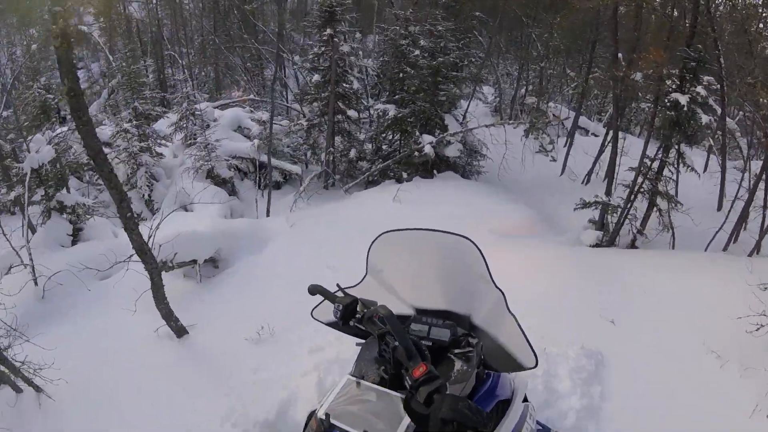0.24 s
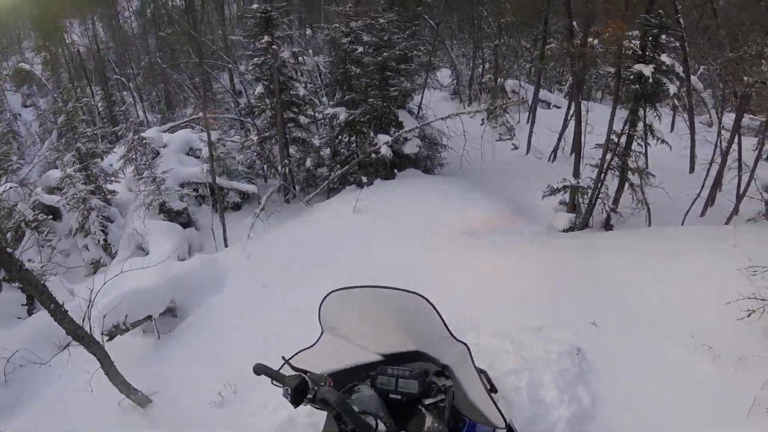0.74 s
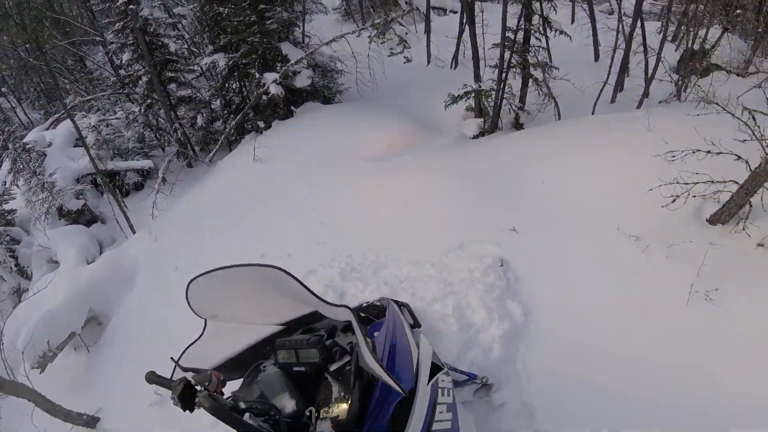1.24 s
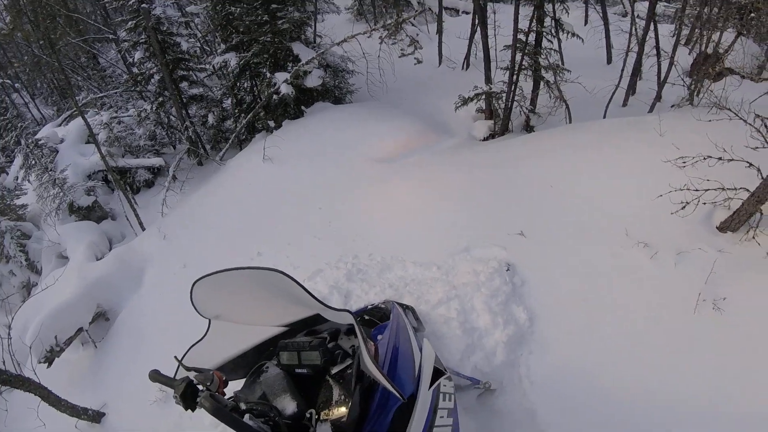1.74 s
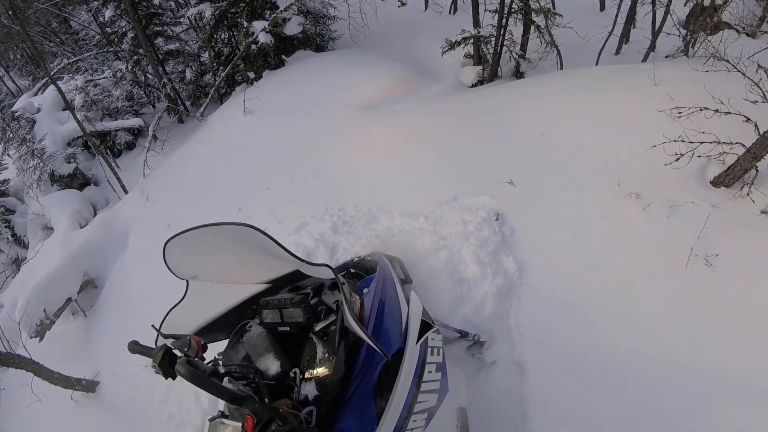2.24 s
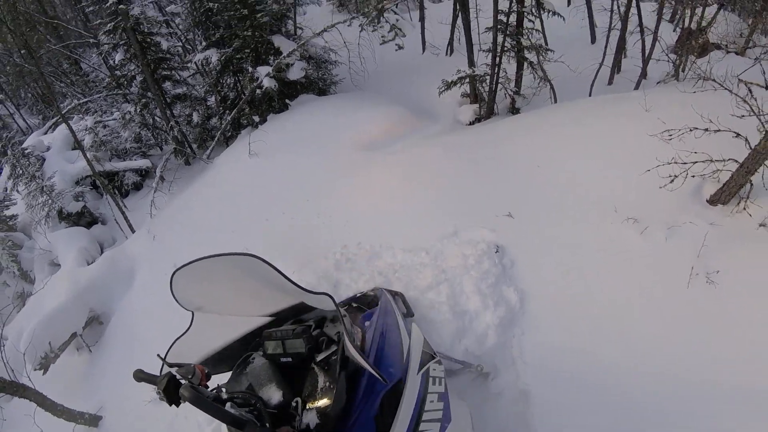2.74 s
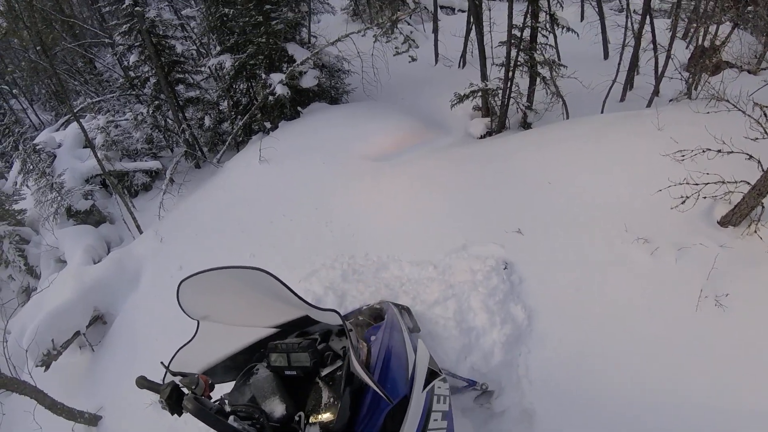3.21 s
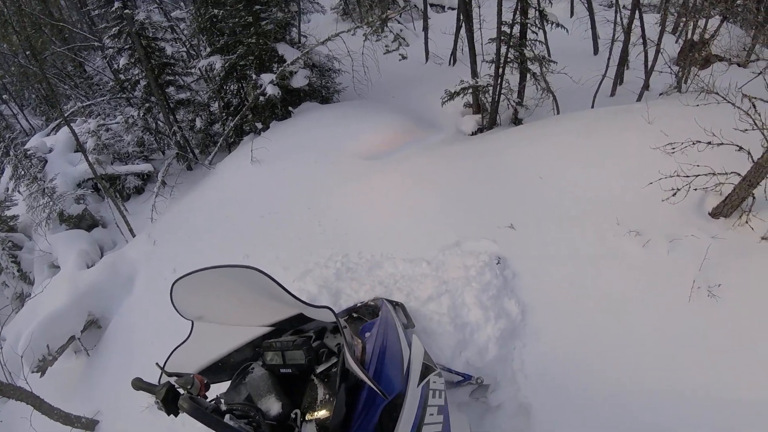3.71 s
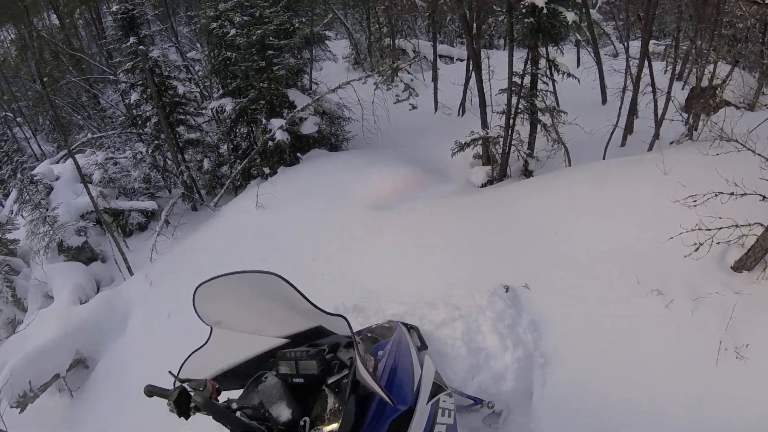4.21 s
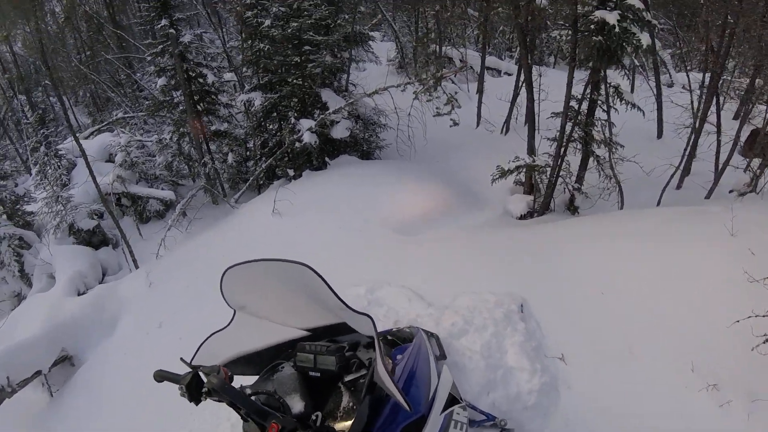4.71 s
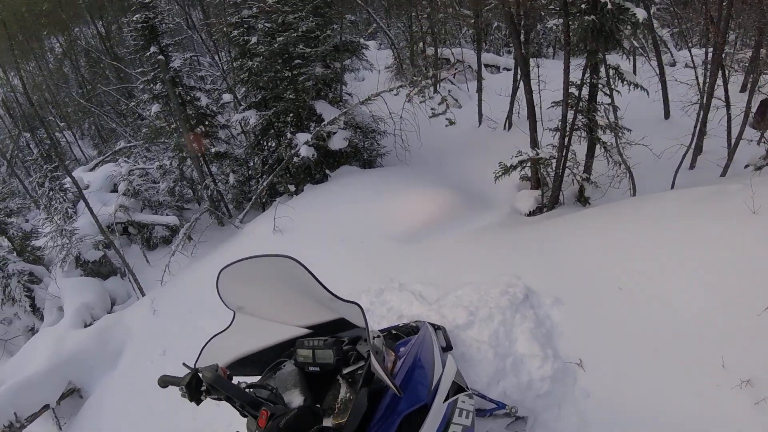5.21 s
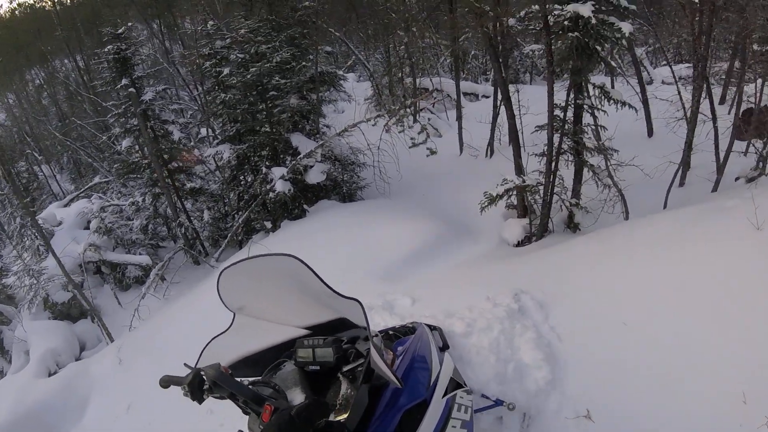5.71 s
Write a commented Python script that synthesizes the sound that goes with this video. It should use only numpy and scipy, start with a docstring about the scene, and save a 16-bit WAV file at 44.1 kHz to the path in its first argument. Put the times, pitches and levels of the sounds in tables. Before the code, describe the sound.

Heard close from the rider's place, a snowmobile engine runs at a low, uneven idle in a snowy forest, then is revved three times. The first rev is short and begins with a couple of knocks, the second holds longer with brief misfires, and the last is the highest, with a slight whine. Between revs the engine sinks with a deep boom, while rasp, clatter and track rumble run underneath.

```python
"""A snowmobile idles in deep snow, then revs three times, with the fuel cut between the revs.
The three-cylinder four-stroke's exhaust booms at the firing rate and its multiples and misfires a few
times; uneven cylinders add lines at thirds of that rate. Gas growls in the pipe, and the block rasps
and clatters with each firing; the microphone's small housing rings. The drive knocks, the track rumbles."""
import sys
import numpy as np
from scipy import signal
from scipy.fft import rfft, irfft
from scipy.io import wavfile
from scipy.ndimage import uniform_filter1d

SR = 44100
rng = np.random.default_rng(int(sys.argv[2]) if len(sys.argv) > 2 else 0)


def unload_audio(sound):
    """Save the sound as a 16-bit wav file, at the path given as the first command line argument."""
    columns = np.transpose(np.atleast_2d(sound))
    # keep every value between -1 and 1, then stretch to whole-number steps
    steps = np.round(np.clip(columns, -1, 1) * 32767)
    wavfile.write(sys.argv[1], SR, steps.astype(np.int16))


N = 262384
STEP = 8   # tones run at SR / STEP

# throttle: (time [s], fuel [1 burning, 0 cut], exhaust gain [dB], extra 1st-order gain [dB])
THROTTLE = [(0, 0.98, 0, 1.5), (1.23, 0.98, 1, -4.5), (1.4, 0.92, 2.5, 4), (1.6, 1, 3, 2),
            (1.87, 1, 0.5, 2.5), (1.96, 0.65, -0.5, 1.5), (2.06, 0.0058, 0.5, 0.5), (2.422, 0, 3, -0.5),
            (2.44, 0.99, -3, 0), (2.7, 0.99, 0, 3.5), (3.03, 1, -0.5, 0.5), (3.15, 0.98, -1.5, 7),
            (3.5, 0.99, 0, 2.5), (3.71, 1, -1, 4), (3.8, 0.99, 0.5, -0.5), (4.282, 0.9, 0, -0.5),
            (4.296, 0.36, 0.5, 1.5), (4.682, 0, 1, 0), (4.697, 0.85, -3.5, 0.5), (4.95, 1, -0.5, -2),
            (5.2, 0.99, -1.5, -2), (5.5, 0.96, -1, -3), (5.95, 0.87, -2, 1)]
# noise under the hood: (time [s], clatter level [dB], rasp level before trim [dB])
HOOD_LEVELS = [(0.03, -47, -47), (0.33, -44.5, -42.5), (0.98, -48.5, -46.5), (1.58, -41, -38),
               (1.76, -41, -41.5), (1.86, -37, -35), (1.89, -42, -40), (2.11, -43, -42.5),
               (2.32, -51.5, -49.5), (2.63, -45, -42.5), (3.2, -40, -38.5), (3.54, -43.5, -41.5),
               (3.74, -34.5, -33), (4.2, -35.5, -33.5), (4.66, -49.5, -46.5), (4.79, -44, -40.5),
               (5.09, -42, -41), (5.31, -33.5, -32), (5.6, -36.5, -37.5), (5.7, -30.5, -32),
               (5.95, -34.5, -32.5)]


def from_db(db):
    return 10 ** (np.asarray(db) / 20)


def rms_one(x):
    return x / np.sqrt(np.mean(x ** 2) + 1e-20)


def lookup(table, at):
    """Other columns, interpolated along the first."""
    axis, *columns = np.transpose(table)
    return np.array([np.interp(at, axis, column) for column in columns])


def in_time(table):
    return lookup(table, np.arange(N) / SR)


def db_at_hz(spectrum, hz):
    points_hz, points_db = np.transpose(spectrum)
    return np.interp(np.log(hz), np.log(points_hz), points_db)


def drift(corner_hz):
    """Slow random wander, rms about 1: noise at SR / 40 through two low-pass poles."""
    pole = np.exp(-2 * np.pi * corner_hz * 40 / SR)
    slow = signal.lfilter([1], [1, -2 * pole, pole * pole], rng.standard_normal(N // 40 + 2002))[2000:]
    return np.interp(np.arange(N) / 40, np.arange(len(slow)), rms_one(slow))


def resonance(x, hz, width_hz):
    """Two-pole band-pass, peak gain 1."""
    r = np.exp(-np.pi * width_hz / SR)
    feedback = [1, -2 * r * np.cos(2 * np.pi * hz / SR), r * r]
    return signal.lfilter(np.array([1, 0, -1]) * (1 - r * r) / 2, feedback, x)


def coloured(x, spectrum):
    """Shapes x by the spectrum, -45 dB/octave beyond its ends; rms 1."""
    hz = np.maximum(np.arange(N // 2 + 1) * SR / N, 1)
    octaves_below = np.maximum(np.log2(spectrum[0][0] / hz), 0)
    octaves_above = np.maximum(np.log2(hz / spectrum[-1][0]), 0)
    gain_db = db_at_hz(spectrum, hz) - 45 * (octaves_below + octaves_above)
    return rms_one(irfft(rfft(x) * from_db(gain_db), N))


def firing_noise(phase, depth_db, flicker_db, scatter_db=1.5):
    """Noise that swells with each firing, by a random amount."""
    strength = rng.standard_normal(2000)[(phase / (2 * np.pi)).astype(int)]
    swell = (1 - np.cos(phase)) / 2
    swell_db = swell * (depth_db + scatter_db * strength)
    return rng.standard_normal(N) * from_db(swell_db + flicker_db * drift(17.3))


def firing_rate_hz():
    """Engine speed: a hunting idle, then the revs."""
    revs = [(0, 38.0), (1.23, 38.0), (1.29, 41.5), (1.41, 56), (1.48, 61), (1.72, 84.4), (1.79, 89),
            (1.94, 87.2), (2.12, 72.6), (2.3, 52.0), (2.43, 40.6), (2.5, 44), (2.78, 73), (2.97, 87),
            (3.06, 90.4), (3.36, 85), (3.46, 84.5), (3.55, 88), (3.71, 99.9), (3.79, 103.2), (4.05, 102.6),
            (4.25, 100.5), (4.69, 50.3), (4.76, 59), (5.03, 81), (5.11, 89.5), (5.27, 103.7), (5.34, 105.4),
            (5.44, 104.8), (5.7, 110.8), (5.8, 109), (5.95, 103.1)]   # (time [s], firing rate [Hz])
    hunt_hz, period_s, crest_s, idle_end_s = 2.2, 0.342, 0.125, 1.26
    t = np.arange(N) / SR
    idling = np.clip((idle_end_s - t) / 0.05, 0, 1)
    hunt = np.cos(2 * np.pi * (t - crest_s) / period_s) * idling
    return uniform_filter1d(in_time(revs)[0], size=1500) + hunt_hz * hunt


def track_rumble():
    """Track and chassis thud in the snow."""
    levels = [(0, -40), (1.2, -38), (1.4, -26), (1.8, -29), (1.95, -37), (2.4, -37), (2.7, -28.5),
              (3.6, -30.5), (3.8, -39), (4.25, -34), (4.4, -35), (5.2, -32), (5.5, -33), (5.95, -32)]   # (time [s], level [dB])
    spectrum = [(15, -25), (30, 5.5), (55, 11.5), (120, 11), (230, -17), (320, -23), (500, -38)]   # (frequency [Hz], relative density [dB])
    return from_db(in_time(levels)[0]) * coloured(rng.standard_normal(N), spectrum)


def valve_clatter(phase):
    """Valve gear noise; the microphone housing rings with it."""
    spectrum = [(3800, -27), (4300, -23.5), (4700, -11), (5560, 1.5), (6050, -7.5), (6300, -2), (6600, 0.5),
                (7360, -6), (9400, -12.5), (9900, -15), (10250, -23.5), (10800, -34), (12500, -32.5),
                (13300, -41.5)]   # (frequency [Hz], relative density [dB])
    level_db, _ = in_time(HOOD_LEVELS)
    noise = firing_noise(phase, depth_db=2.5, flicker_db=0.6)
    housing = from_db(2.5) * resonance(noise, hz=6433, width_hz=205)
    return from_db(level_db) * coloured(noise + housing, spectrum)


def hood_rasp(phase, speed, trim_db=-1.0):
    """Gas and gear noise under the hood; some panels ring at idle, others at speed."""
    spectrum = [(530, -38), (900, -5.5), (1200, -6.5), (1400, -4), (1720, -6.5), (2200, -5), (2560, -8),
                (4500, -20.5), (5850, -53), (9900, -120)]   # (frequency [Hz], relative density [dB])
    # panel modes: (frequency [Hz], nominal width [Hz], gain at idle [dB], gain at full speed [dB])
    panels = [(1087, 9, -15.5, -28.5), (1427, 184, -6, -22), (1572, 77, -29, -6.5), (1698, 71, -31, -15),
              (2177, 65, -14, -26), (2377, 24, -18.5, -11.5)]
    _, level_db = in_time(HOOD_LEVELS)
    noise = firing_noise(phase, depth_db=1.0, flicker_db=-0.9)
    rasp = coloured(noise, spectrum)
    for hz, width_hz, idle_db, full_db in panels:
        ring_db = idle_db + speed * (full_db - idle_db) + 1.5 * drift(2.0)
        stage_width_hz = 1.9 * width_hz
        ring = resonance(resonance(noise, hz, stage_width_hz), hz, stage_width_hz)
        rasp += from_db(ring_db) * rms_one(ring)
    return from_db(level_db + trim_db) * rasp


def drive_knocks(attack_s=0.0042, decay_s=0.0057):
    """Knocks in the drive: short damped rings."""
    hits = [(1.2803, -19.5, 1484), (1.307, -19, 1430), (1.8505, -34, 1600), (4.627, -24, 1074)]   # (time [s], gain [dB], frequency [Hz])
    t = np.arange(int(0.06 * SR)) / SR
    envelope = np.exp(-t / decay_s) * (1 - np.exp(-t / attack_s))
    out = np.zeros(N)
    for start_s, gain_db, hz in hits:
        out[round(start_s * SR):][:len(t)] += from_db(gain_db) * envelope * np.sin(2 * np.pi * hz * t)
    return out


def pipe_growl(phase, level_db):
    """Turbulent gas in the pipe, pulsing with each firing."""
    spectrum = [(200, 3.5), (280, 6), (340, -1.5), (430, 4.5), (520, 0.5), (600, 1), (680, -2.5),
                (800, -3.5), (900, -22.5), (1050, -5)]   # (frequency [Hz], relative density [dB])
    return from_db(level_db) * coloured(firing_noise(phase, depth_db=3.0, flicker_db=1.0), spectrum)


def uneven_cylinders(phase, level_db, waver_db=2.2):
    """The three cylinders differ, so lines stand at thirds between the orders."""
    lines = [(1, -1), (2, 5.5), (4, 0.5), (5, -9.5), (7, -9), (8, -5), (10, -14), (11, -27.5), (13, -12.5),
             (14, -35), (16, -24), (17, -28.5)]   # (frequency [thirds of the firing rate], gain [dB])
    out = 0
    for thirds, gain_db in lines:
        amplitude = from_db(level_db + gain_db + waver_db * drift(8)[::STEP])
        out += amplitude * np.sin(thirds * phase / 3 + rng.uniform(0, 2 * np.pi))
    return out


def whine(phase):
    """Ninth order in the last rev: rises, holds, starts to fade."""
    start_s, rise_s, hold_s, rms_db, fall_db_per_s = 5.36, 0.17, 0.34, -37, 90
    t = np.arange(0, N, STEP) / SR - start_s
    level_db = rms_db - fall_db_per_s * np.maximum(t - rise_s - hold_s, 0)
    return np.sqrt(2) * np.clip(t / rise_s, 0, 1) * from_db(level_db) * np.cos(9 * phase)


def misfire_share(width_s=0.013):
    """Share of the overtones lost: a brief bump at each missed firing."""
    misfires = [(1.912, 0.96), (1.976, 0.6), (2.009, 0.5), (2.044, 0.35), (3.22, 0.8), (3.287, 0.7),
                (3.397, .5)]   # (time [s], share lost [0-1])
    t = np.arange(0, N, STEP) / SR
    return np.minimum(sum(share * np.exp(-((t - at_s) / width_s) ** 2) for at_s, share in misfires), 1)


def order_levels_db(firing_hz):
    """Blends burning and fuel-cut levels; on a cut the 1st order booms and the rest die back."""
    # exhaust orders: (firing rate [Hz], 1st [dB], 2nd [dB], 3rd [dB], bark of the higher orders [dB])
    burning = [(34.7, -22.5, -19, -25.5, -32.5), (39.6, -23, -14.5, -25.5, -30.5),
               (45.8, -28, -13, -31, -25), (53.2, -25, -18.5, -33, -24), (62.7, -21.5, -26, -28.5, -19.5),
               (75, -22.5, -28, -23, -24.5), (86, -20, -25.5, -21, -21), (90.9, -18.5, -27, -24, -25.5),
               (99.3, -21.5, -24, -38, -25), (103.7, -25.5, -23.5, -40, -24), (109, -30, -20.5, -33.5, -22)]
    fuel_cut = [(40.6, -24.5, -46, -46, -51), (52, -16.5, -34, -37.5, -36), (64, -14, -35.5, -41, -40.5),
                (76.6, -12.5, -31.5, -36, -38.5), (95, -11, -34, -34.5, -34.5)]
    fuel, gain_db, first_db = in_time(THROTTLE)[:, ::STEP]
    levels_db = fuel * lookup(burning, firing_hz) + (1 - fuel) * lookup(fuel_cut, firing_hz) + gain_db
    levels_db[0] += first_db
    return levels_db


def exhaust(phase, firing_hz, speed, lag_rad=0.95, misfire_boom=0.8, waver_db=1.5):
    """Orders of the firing rate as sines; from the 4th up they pass the pipe resonances."""
    pipe = [(140, -2), (190, -7), (240, 0.5), (290, -13), (340, -15.5), (430, -14.5), (520, -17), (610, -7),
            (650, -22), (680, -24.5), (718, -17), (770, -26), (822, -19.5), (870, -30), (1100, -32)]   # pipe response: (frequency [Hz], gain [dB])
    *low_db, bark_db = order_levels_db(firing_hz)
    missed = misfire_share()
    dull_db_per_octave = 22.5 * (1 - speed) ** 2   # duller at low speed
    out = 0
    for order in range(1, 30):
        if order < 4:
            level_db = low_db[order - 1]
        else:
            hz = order * firing_hz
            pipe_db = db_at_hz(pipe, hz) - 60 * (hz > 1100)
            dull_db = dull_db_per_octave * np.maximum(np.log2(hz / 260), 0)
            level_db = bark_db + pipe_db - dull_db + waver_db * drift(11)[::STEP]
        # an unburnt charge booms and has no overtones
        gain = 1 + misfire_boom * missed if order == 1 else 1 - missed
        spread_rad = lag_rad * order ** 2   # the pipe spreads each pulse
        out -= gain * from_db(level_db) * np.cos(order * phase + spread_rad)
    return np.sqrt(2) * out


def scene():
    """One firing phase drives all the engine's tones and noises."""
    firing_hz = firing_rate_hz()
    phase = 2 * np.pi * np.cumsum(firing_hz) / SR   # one turn per firing
    speed = (firing_hz - 38) / 70   # 0 idle, 1 full speed
    fuel_cut = 1 - in_time(THROTTLE)[0]
    slow_cut = uniform_filter1d(fuel_cut, size=6000)
    switching = 4 * slow_cut * (1 - slow_cut)   # 1 midway between burning and cut
    uneven_db = -38 + 4 * speed - 6.5 * fuel_cut + 10 * switching
    growl_db = -41.5 + 8.5 * speed - 3.5 * fuel_cut + 3 * switching
    tones = exhaust(phase[::STEP], firing_hz[::STEP], speed[::STEP]) + whine(phase[::STEP])
    tones += uneven_cylinders(phase[::STEP], uneven_db[::STEP])
    noises = track_rumble() + pipe_growl(phase, growl_db) + hood_rasp(phase, speed) + valve_clatter(phase)
    return (signal.resample_poly(tones, STEP, 1)[:N] + noises + drive_knocks())[None]


def record(dry):
    """Steep low-pass on the top treble."""
    stop_db, stop_hz = 40, 13600
    return signal.sosfilt(signal.cheby2(12, stop_db, stop_hz, fs=SR, output="sos"), dry)


dry = scene()
out = record(dry)
unload_audio(out)
```